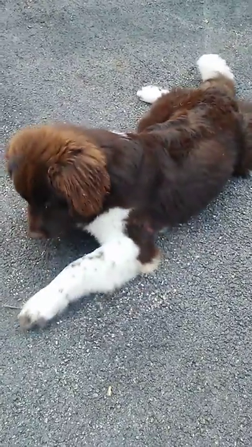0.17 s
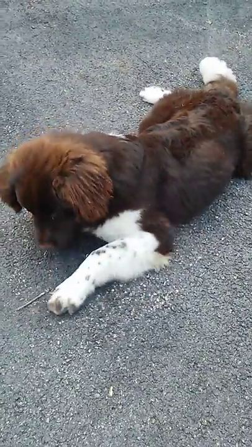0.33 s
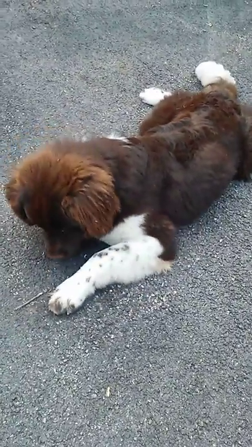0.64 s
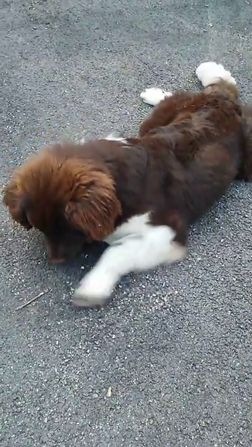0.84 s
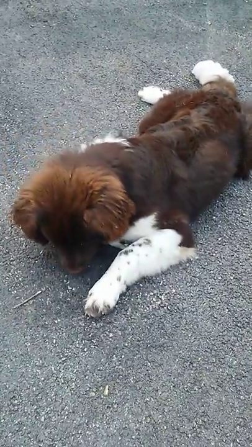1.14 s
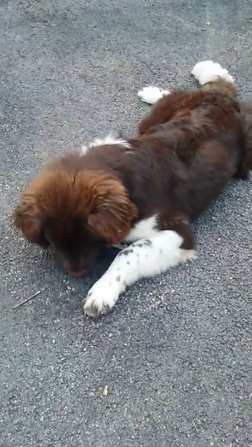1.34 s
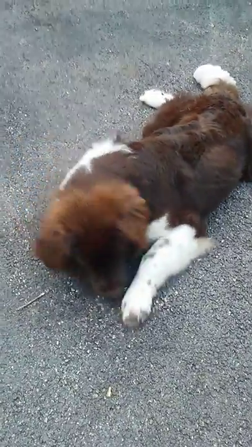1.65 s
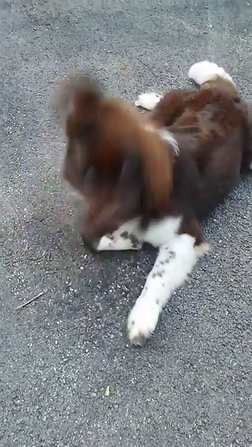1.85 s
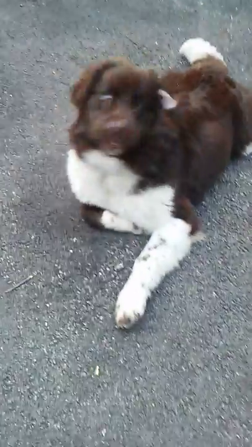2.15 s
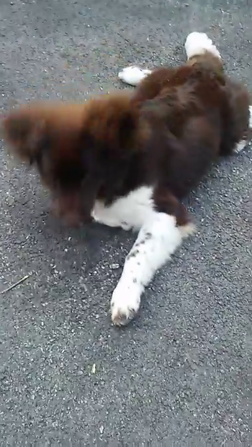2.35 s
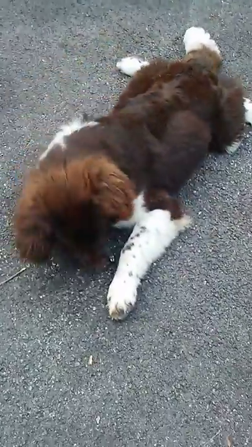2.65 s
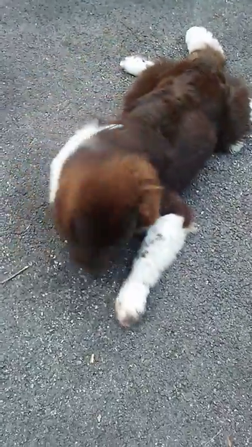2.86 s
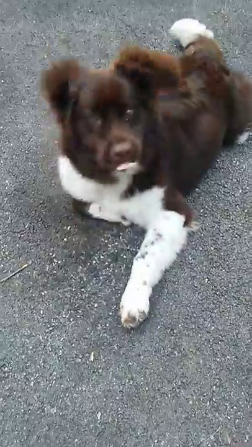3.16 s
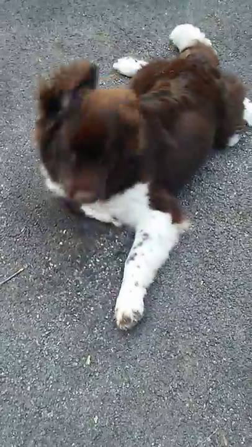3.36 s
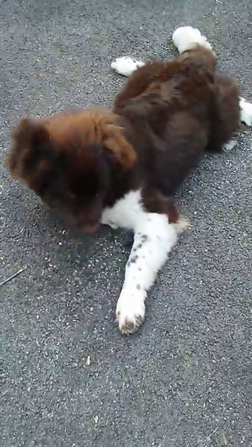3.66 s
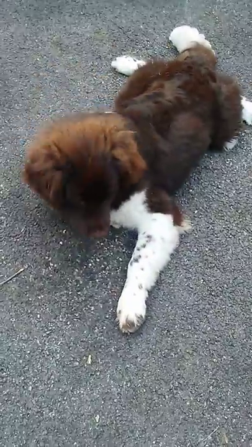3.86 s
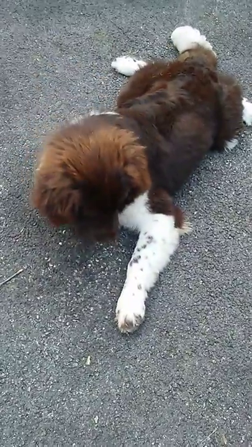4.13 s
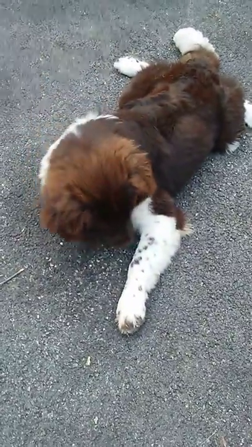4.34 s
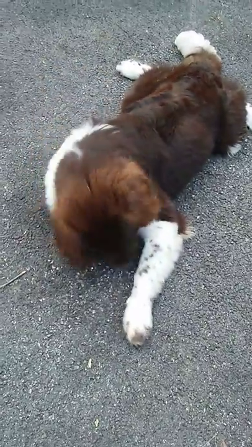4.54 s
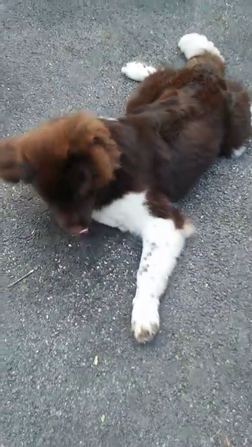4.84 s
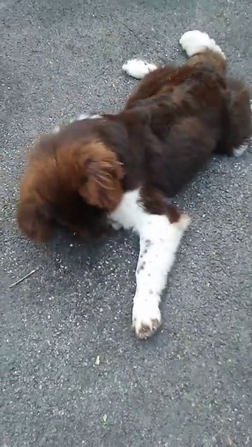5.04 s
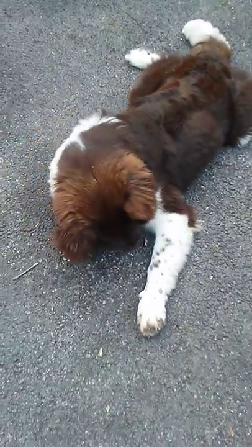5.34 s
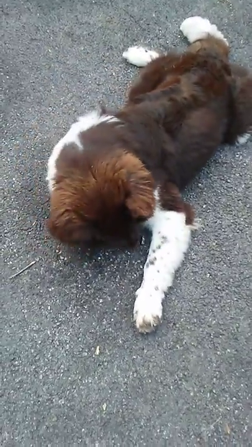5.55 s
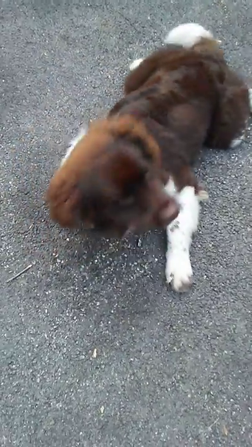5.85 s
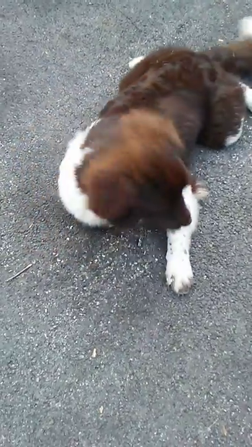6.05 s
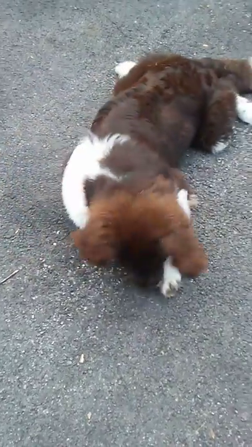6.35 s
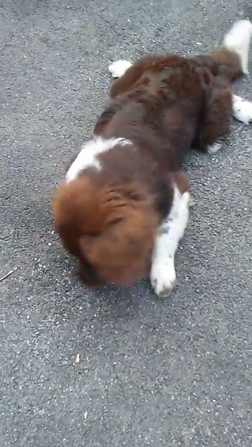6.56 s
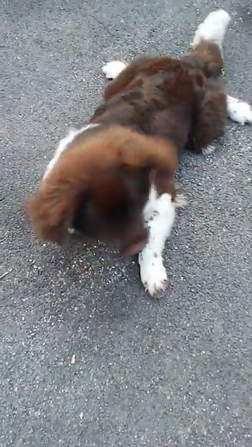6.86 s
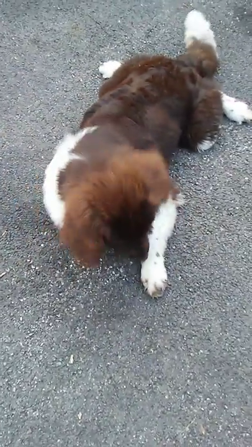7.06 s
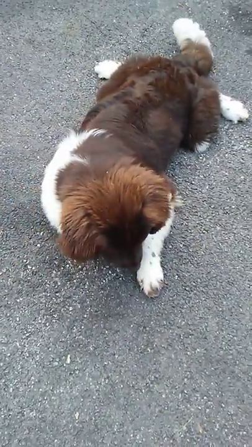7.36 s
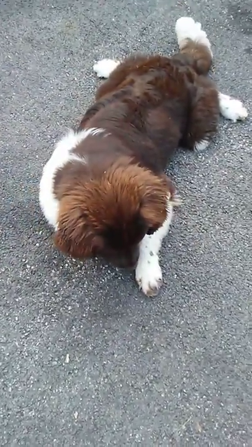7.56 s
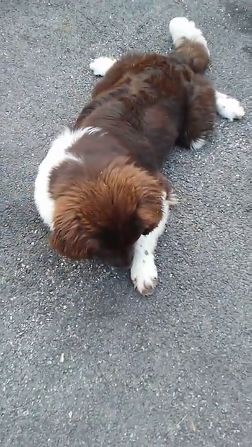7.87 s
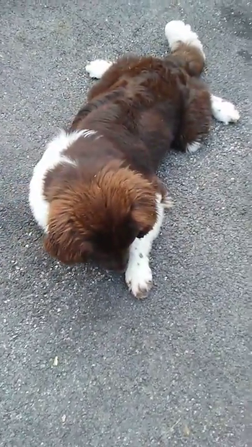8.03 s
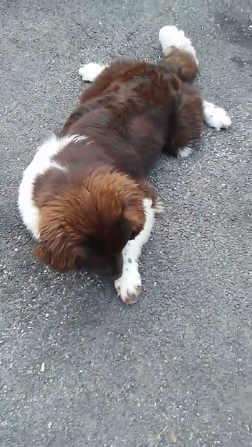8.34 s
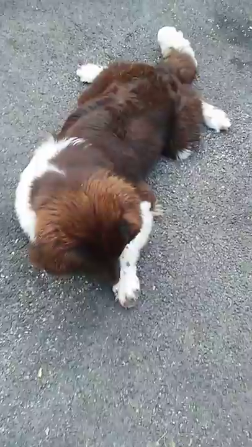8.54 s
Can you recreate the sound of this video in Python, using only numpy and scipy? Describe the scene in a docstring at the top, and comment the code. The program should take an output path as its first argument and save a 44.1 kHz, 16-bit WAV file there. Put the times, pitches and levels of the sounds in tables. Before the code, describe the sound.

A cicada close to the microphone starts at once with tiny chopped buzzes, then a dense, harsh, high burst from 0.1 to 0.8 seconds, a few fragments, and another burst from about 1.0 to 1.9, slowing at its end. Gritty rubs and wing scrapes sound near 0.1 and 1.9. Around 2.0 it stalls into dry clicks, then rasps again from 2.2 to 2.65 and 2.8 to 3.05. A bird farther off whistles nearly pure, swooping notes between 2.2 and 3.15. Bright stuttering clicks follow until 3.35, with a lone one at 3.6. From 4.0 a long buzz, slower and more ringing, about 55 to 70 pulses a second, swells and wavers to the end at 8.7. Low wind buffets come near 4.3 and 4.8. A faint distant engine hums from 3.1, fuller after 5.7, over soft outdoor rumble and hiss with a slight short echo.

```python
"""Outdoors on asphalt, a cicada close to the microphone buzzes in broken bursts from the start, its two tymbals
clicking in turn and ringing its hollow body; a puppy noses at it, and filtered grit makes rubs and wing scrapes.
Near 2 s the buzz stalls into single clicks and restarts; a bird farther off whistles gliding, nearly pure notes.
After 3 s a distant engine hums as wavering tones; near 4 s the buzz settles into one long burst, with wind buffets.
Outdoor air lies behind it all as coloured noise, and the yard returns a quick scatter and a faint tail."""
import sys
import numpy as np
from scipy import signal
from scipy.fft import rfft, irfft, next_fast_len
from scipy.io import wavfile
from scipy.ndimage import uniform_filter1d, map_coordinates

SR = 44100
rng = np.random.default_rng(int(sys.argv[2]) if len(sys.argv) > 2 else 0)


def generate_wav(signal):
    """Clip the signal to [-1, 1] and save it as 16-bit WAV at the path in sys.argv[1]."""
    frames = np.transpose(np.atleast_2d(signal))
    scaled = np.clip(frames, -1, 1) * 32767
    pcm = np.round(scaled).astype(np.int16)
    wavfile.write(sys.argv[1], SR, pcm)


N = 383669
TIME = np.arange(N) / SR
FAST_N = next_fast_len(N, real=True)

# bursts of buzz: (first stroke t/s, last stroke limit t/s, stroke rate f/Hz before spin-up and hurry, same at the end,
# tymbals at work, they take turns from t/s, until t/s, later ribs as a share of the first click before
# freshness and purity, unsteadiness 0-1 once settled, sharp edge level/dB relative to the snap when no longer fresh)
BURSTS = [(0.01, 0.06, 99, 100, 2, .064, .064, 0.43, .9, -23),
          (0.088, 0.811, 99, 86, 2, .41, .68, 0.32, 0.24, -23.5),
          (0.852, 0.88, 110, 93, 2, .882, .882, 0.26, 0.3, -27),
          (0.904, 0.936, 96, 96, 2, .94, .94, 0.44, .25, -24),
          (0.973, 1.675, 89, 83, 2, 0.95, 1.672, .65, 0.38, -23.5),
          (1.686, 1.888, 86, 58, 1, 1.684, 1.684, 0.7, 1, -25.5),
          (2.201, 2.663, 74, 70, 1, 2.199, 2.199, 0.48, .45, -13),
          (2.794, 3.066, 85, 61, 2, 2.85, 3.066, .5, 0.59, -25.5),
          (3.988, 8.69, 54.5, 55.7, 2, 4.21, 8.69, 0.42, 0.99, -19.5)]
# the long burst hurries now and then: (t/s, extra stroke rate f/Hz)
HURRY = [(3.99, 0), (4.05, 9), (4.55, 19), (4.72, 0), (4.86, 9), (5.15, 11), (5.75, 1), (5.95, 4.5),
         (6.3, 1), (6.42, 11), (6.62, 8), (6.75, 3), (8.1, 0)]
# lone clicks in the stall: (t/s, clicks, first level/dB, last level/dB, sharp edge level/dB relative to the snap);
# the first two levels are added to those of the body parts
STUTTERS = [(1.979, 3, -28.5, -32, -7), (2.1145, 1, -28.5, -28.5, -13), (2.6942, 1, -27, -27.5, -9),
            (2.729, 4, -28.5, -34, -10), (3.081, 5, -21.5, -15, -22), (3.186, 8, -15, -15, -19.5),
            (3.332, 1, -17, -17.5, -21), (3.6009, 1, -24, -23.5, -16)]
# body resonances in each phrase, before stroke-to-stroke changes: (t/s, belly level/dB, ring level/dB, snap level/dB)
FAST_PHRASE_LEVELS = [(.03, -45, -61, -48.5), (.27, -35.5, -43.5, -42), (.45, -38, -42, -47),
                      (.8, -40, -54, -58), (.87, -38.5, -46.5, -45.5), (.96, -45, -50, -59),
                      (1.05, -39, -50, -51), (1.3, -41.5, -47, -42), (1.64, -38.5, -40, -42.5),
                      (1.74, -50.5, -49, -49), (1.87, -43.5, -37, -41.5)]
BROKEN_PHRASE_LEVELS = [(2.2, -50.5, -45.5, -52.5), (2.32, -48.5, -37, -50.5), (2.48, -46, -32, -48.5),
                        (2.87, -50.5, -50.5, -54), (2.92, -35.5, -29, -39.5), (3.04, -34.5, -27.5, -35.5)]
LONG_PHRASE_LEVELS = [(4.0, -59, -47.5, -50.5), (4.33, -49, -39, -41.5), (4.46, -52, -43, -46),
                      (4.53, -58, -50, -51), (4.66, -48, -39.5, -47), (4.88, -49.5, -33, -44.5),
                      (5.03, -45, -42.5, -46.5), (5.15, -49, -44, -49.5), (5.35, -47, -24, -45),
                      (5.65, -48, -28, -45.5), (5.8, -47, -36, -47.5), (6.03, -41.5, -31.5, -42),
                      (6.3, -46.5, -33.5, -45.5), (6.42, -61, -45, -51.5), (6.56, -48.5, -40, -47),
                      (6.67, -41, -27.5, -40.5), (7.09, -41, -27, -37), (7.125, -45, -33, -41),
                      (7.39, -49, -37.5, -50.5), (7.55, -46.5, -31, -44), (7.98, -46.5, -33, -41),
                      (8.23, -49.5, -37, -45), (8.58, -49.5, -39, -47), (8.69, -49, -33, -44)]
# the way the insect holds its body: (t/s, belly resonance f/Hz, tymbal ring f/Hz)
BODY_POSE = [(0, 3100, 4680), (.8, 3300, 4610), (1.1, 3440, 4930), (2.95, 3450, 4950), (3.3, 3600, 5050),
             (4.3, 3490, 4810), (5.45, 3402, 5160), (5.9, 3200, 4895), (7.0, 3405, 4934), (7.5, 3290, 4810)]
# body modes in the reference pose, undamped: (f/Hz, whole length/ms, level/dB within its group)
BELLY_MODES = [(2963, 3.3, 5), (3550, 1.96, 14.5)]
PLATE_MODES = [(4934, 2.68, 0)]
SNAP_MODES = [(5700, 4.1, -1), (6171, 4.8, 6), (6661, 3.06, 10), (7260, 1.9, -0.5)]
EDGE_MODES = [(8103, 1.05, 1.5), (9925, 1.25, -10.5), (14250, 0.96, -13.5)]
BELLY_HZ, RING_HZ = 3432, 4913  # the reference pose

# a burst starts this share slow, and moves to its end rate mostly late
SPIN_UP, SPIN_UP_S, SAG_POWER = .2, .04, 2.5
# the first strokes are sharper and rattle more; that wears off
FRESH_S, FRESH_EDGE_DB, FRESH_RATTLE = 0.95, 8.5, 0.66
STALL_HZ = 57.1  # stroke rate when the buzz stalls
# the tymbals buckle almost together at the slowest pace and part as it quickens, up to a share of the period
TOGETHER_MS, TOGETHER_HZ, PARTING_MS_PER_HZ, WIDEST_SHARE = 2.3, 54.15, .7, .43
SLIDE_MS, SLIDE_HZ = 2.3, 16  # the two tymbals slide in and out of step
IN_STEP_MS = 2  # lag of the second tymbal while the two work in step
UNEVEN_DB = 1.27  # spread of strength from stroke to stroke
SWELL_DB, SWELL_HZ = 1.3, 14  # the strength of both tymbals also swells and dips
# as the plate's ring stands further above the belly, the later ribs fade (dB per dB)
PURE_FROM_DB, PURITY = 8, 0.42
# mean delays of the second and third ribs behind the first, and the third's strength relative to the second
RIB_MS, LAST_RIB_MS, LAST_SHARE = 2.2, 3.4, .5
JITTER_MS, GLIDE_MS, GLIDE_HZ = .035, .1, 3  # rib delays vary a little from stroke to stroke and glide slowly
# the later ribs ring the belly and the overtones more than the plate, and shorten its ring
BELLY_RATTLE, SNAP_RATTLE, LOSS = 1.3, 1.6, .3
SCATTER = .008  # detuning of a stroke, as a share of pitch

# gritty rubs, wing scrapes and low wind buffets: (t/s, length/s, centre f/Hz, width f/Hz, level/dB)
SCUFFS = [(0.121, 0.29, 2550, 700, -45), (1.896, 0.076, 2620, 1000, -44), (1.886, 0.055, 866, 120, -46.5),
          (1.942, 0.15, 2720, 500, -48.5), (2.06, 0.12, 2730, 500, -53), (2.66, 0.085, 121, 40, -49),
          (2.786, 0.19, 6140, 1200, -69), (3.33, 0.071, 5900, 1800, -58), (4.266, 0.036, 2770, 400, -51),
          (4.254, .14, 104, 38.2, -50.5), (4.702, 0.24, 77, 30, -48)]
# one list a whistled note: (t/s, pitch f/Hz before smoothing and waver, level/dB before the taper)
BIRD_NOTES = [
    [(2.235, 3000, -57), (2.26, 2760, -44), (2.28, 2740, -41), (2.305, 2860, -42), (2.33, 2790, -38.5),
     (2.362, 2700, -43)],
    [(2.498, 3060, -49), (2.53, 2690, -39), (2.55, 2540, -46), (2.566, 2750, -39), (2.585, 3050, -31.5),
     (2.605, 2790, -42), (2.628, 2520, -41)],
    [(2.705, 2720, -43), (2.745, 2410, -43.5), (2.77, 2740, -43.5), (2.79, 3140, -43), (2.83, 3020, -36.5)],
    [(3.03, 2590, -42), (3.09, 3280, -41), (3.148, 2790, -41)],
    [(3.88, 2300, -75), (3.97, 3000, -71), (4.04, 3200, -59)],
]
# outdoor reverberation: (f/Hz, time to fall by 60 dB/s)
YARD_DECAY = [(500, 0.065), (3000, 0.3), (6000, 0.28), (12000, 0.018)]
NEAR_S = .006  # decay constant of the close scatter
# distant engine tones, before offset, waver and flutter: (t/s, f/Hz, level/dB)
LOW_DRONE = [(3.15, 122, -54), (3.3, 120.6, -50), (3.6, 108, -69), (4.0, 106.1, -54.5), (5.3, 105, -53),
             (6.6, 110.8, -44.5), (7.6, 108.9, -45.5), (8.7, 113.6, -49)]
UPPER_DRONE = [(5.68, 181.3, -51.5), (7.0, 176.1, -50), (7.3, 173.5, -44.5), (7.7, 171.1, -47.5),
               (8.7, 165, -49.5)]
# outdoor air, before offsets and gusts:
# (t/s, rumble level/dB, wash level/dB, traffic murmur level/dB, hiss level/dB)
AIR_LEVELS = [(0.0, -59, -53, -55.5, -72), (1.5, -60.5, -53, -52, -63.5), (3.1, -55.5, -56.5, -58, -60.5),
              (3.78, -61, -60.5, -63.5, -92), (4.38, -52.5, -55, -58, -62), (8.48, -51.5, -56, -63, -62),
              (8.7, -49, -57.5, -56, -70)]
# relative spectra of the four air layers: (f/Hz, level/dB per Hz)
RUMBLE_SPECTRUM = [(20, -13), (35, -45), (58, 3), (85, 0), (125, 2), (160, -10), (215, -4.5), (280, -17),
                   (500, -45.5)]
WASH_SPECTRUM = [(50, -31), (130, 2.5), (280, 2), (420, 2), (620, 0), (820, 4.5), (980, 6.5), (1200, -27.5),
                 (2000, -27)]
MURMUR_SPECTRUM = [(600, -51), (900, 0.5), (1040, 8), (1150, 2.5), (1400, 1), (1800, -1), (2500, -1.5),
                   (3200, -14.5), (6000, -37), (11000, -35)]
HISS_SPECTRUM = [(2000, -21), (6000, 11), (11500, -12), (14500, -8.5)]
TOP_HZ = 15950  # almost nothing sounds above


def buzz():
    """All the bursts of the cicada's song, close to the microphone."""
    return sum(burst(*row) for row in BURSTS)


def burst(start, end, cruise_hz, end_hz, tymbals, apart_from, apart_until, rattle, unsteady, edge_db,
          jitter_ms=.2, lag_jitter_ms=.6, unsettled=.95):
    """One burst of buzz: paced strokes of one tymbal, with the other, if at work, trailing it."""
    times, hz = pace(start, end, cruise_hz, end_hz)
    settled = times >= apart_from
    fresh = np.exp(-(times - start) / FRESH_S)
    unsteady = np.where(settled, unsteady, unsettled)  # steady strokes fuse into a pitched rasp

    parting_ms = PARTING_MS_PER_HZ * np.maximum(hz - TOGETHER_HZ, 0)
    slide_ms = unsteady * SLIDE_MS * wander(times, SLIDE_HZ)
    lag_ms = abs(TOGETHER_MS + parting_ms + slide_ms)
    lag_ms = np.minimum(lag_ms, WIDEST_SHARE * 1000 / hz)
    lag_ms = np.where(settled & (times < apart_until), lag_ms, IN_STEP_MS)

    levels_db = follow(FAST_PHRASE_LEVELS + BROKEN_PHRASE_LEVELS + LONG_PHRASE_LEVELS, times)
    belly_db, ring_db, _ = levels_db
    swell_db = SWELL_DB * unsteady * wander(times, SWELL_HZ)
    purity_db = -PURITY * np.maximum(ring_db - belly_db - PURE_FROM_DB, 0)
    rattle = rattle * (1 + FRESH_RATTLE * fresh) * amp(purity_db)

    count = round(tymbals)
    out = np.zeros(N)
    for late_ms, spread_ms in [(0, jitter_ms), (lag_ms, lag_jitter_ms)][:count]:
        slip, force = unsteady * rng.standard_normal((len(times), 2)).T
        # the power is shared among the strokes of each second
        levels = [amp(db + swell_db + UNEVEN_DB * force) / np.sqrt(hz * count) for db in levels_db]
        at = times + (late_ms + slip * spread_ms) / 1000
        out += buckle(at, levels, rattle, unsteady, edge_db + FRESH_EDGE_DB * fresh)
    return out


def pace(start, end, cruise_hz, end_hz):
    """Stroke times and rates of one burst: the muscle spins up, cruises and drifts to its end rate."""
    age = np.linspace(0, end - start, num=2000)
    hz = cruise_hz + (end_hz - cruise_hz) * (age / age[-1]) ** SAG_POWER
    hz = hz + follow(HURRY, start + age)[0]
    hz = hz * (1 - SPIN_UP * np.exp(-age / SPIN_UP_S))
    turns = (np.cumsum(hz) - hz[0]) * age[1]
    # evenly spaced turns, about one a stroke
    strokes = np.linspace(0, turns[-1], num=round(turns[-1]) + 1)
    return start + np.interp(strokes, turns, age), np.interp(strokes, turns, hz)


def stutter(belly_db=-42, ring_db=-34, snap_db=-38, late_ms=1.1, rattle=0.69, unsteady=.7):
    """Lone strokes, or short runs at the slow pace of the stalled buzz."""
    out = np.zeros(N)
    for s, clicks, first_db, last_db, edge_db in STUTTERS:
        db = np.linspace(first_db, last_db, num=round(clicks))
        times = s + late_ms / 1000 + np.arange(len(db)) / STALL_HZ
        levels = [amp(db + part) for part in (belly_db, ring_db, snap_db)]
        out += buckle(times, levels, np.full(len(db), rattle), np.full(len(db), unsteady), edge_db)
    return out


def buckle(times, levels, rattle, unsteady, edge_db, belly_late_ms=.45, snap_late_ms=1.0):
    """A tymbal stroke: three ribs buckle in a row, each ringing belly, tymbal plate and bright overtones."""
    belly_hz, ring_hz = follow(BODY_POSE, times)
    chance = unsteady[:, None] * rng.standard_normal((len(times), 4))
    delay_ms = np.array([0, RIB_MS, LAST_RIB_MS]) + JITTER_MS * chance[:, 1:]
    delay_ms = delay_ms + GLIDE_MS * wander(times, GLIDE_HZ)[:, None] * np.arange(3)
    rib_times = (times[:, None] + delay_ms / 1000).ravel()

    steady = np.ones(len(times))
    detune = 1 + SCATTER * chance[:, 0]
    belly, ring, snap = levels
    # (modes, level, pitch stretch, damping, later ribs' share, lateness ms);
    # a rattling tymbal also rings more briefly, so its band widens
    parts = [(BELLY_MODES, belly, belly_hz / BELLY_HZ, steady, BELLY_RATTLE * rattle, belly_late_ms),
             (PLATE_MODES, ring, ring_hz / RING_HZ, 1 + LOSS * rattle, rattle, 0),
             (SNAP_MODES, snap, steady, steady, SNAP_RATTLE * rattle, snap_late_ms),
             (EDGE_MODES, snap * amp(edge_db), steady, steady, rattle, snap_late_ms)]
    out = np.zeros(N)
    for modes, level, stretch, damping, share, late_ms in parts:  # the plate sounds first, then the body answers
        ribs = np.transpose([steady, share, LAST_SHARE * share])
        sizes = level[:, None] * ribs / np.linalg.norm(ribs, axis=1, keepdims=True)
        answer = rib_times + late_ms / 1000
        out += strike(answer, sizes.ravel(), modes, np.repeat(stretch * detune, 3), np.repeat(damping, 3))
    return out


def strike(times, sizes, modes, stretch, damping):
    """Each click swells and dies in its modes within milliseconds; its energy is its size squared."""
    t = np.arange(-100, 101) / SR
    rings = np.zeros((len(times), len(t)))
    for hz, length_ms, db in modes:
        age = np.clip(1000 * t * damping[:, None] / length_ms, -.5, .5)
        swell = np.cos(np.pi * age) ** 2
        rings += amp(db) * swell * np.sin(2 * np.pi * hz * stretch[:, None] * (t - t[0]))
    rings *= (sizes / np.sqrt((rings ** 2).sum(1) / SR))[:, None]
    out = np.zeros(N)
    for s, ring in zip(times, rings):
        add(out, s + t[0], ring)
    return out


def scuffs(grain_db=4.0):
    """Short gritty rubs, wing scrapes and low wind buffets: uneven noise through a resonance."""
    out, hz = np.zeros(N), np.fft.rfftfreq(SR, 1 / SR)
    for s, length, centre_hz, width_hz, db in SCUFFS:
        grain = unit(uniform_filter1d(rng.standard_normal(SR), size=120))
        grit = rng.standard_normal(SR) * amp(grain_db * grain)
        resonance = 1 / (1 + (2 * (hz - centre_hz) / width_hz) ** 2)
        rub = irfft(rfft(grit) * resonance, SR)[:int(length * SR)]
        add(out, s, amp(db) * unit(rub * signal.windows.tukey(len(rub), .7)))
    return out


def bird(waver=0.01):
    """A bird farther off: nearly pure whistled notes whose pitch swoops up and down."""
    out, wobble = np.zeros(N), 1 + waver * drift(148.6)
    for note in BIRD_NOTES:
        t = np.arange(note[0][0], note[-1][0], 1 / SR)
        hz, db = follow(note, t)
        smooth_hz = uniform_filter1d(hz, size=500)
        turns = np.cumsum(smooth_hz * np.interp(t, TIME, wobble)) / SR
        whistle = unit(np.sin(2 * np.pi * turns))
        add(out, t[0], amp(db) * whistle * signal.windows.tukey(len(t), .15))
    return out


def yard(x, near_db=-17, far_db=-20):
    """Quick scatter from the ground and the puppy, then a faint outdoor tail with its own decay by pitch."""
    taps = rng.standard_normal(SR // 2)
    hz, t, z = signal.stft(taps, SR, nperseg=256)
    decay = amp(-60 * t / spectrum_at(YARD_DECAY, hz)[:, None])
    far = signal.istft(z * decay, SR, nperseg=256)[1][:len(taps)]
    age = np.arange(len(taps)) / SR
    near = rng.standard_normal(len(taps)) * np.exp(-age / NEAR_S) * (age > .001)
    far = far * (age > .006)
    echo = amp(near_db) * near / np.linalg.norm(near) + amp(far_db) * far / np.linalg.norm(far)
    return signal.fftconvolve(x, echo)[:N]


def engine(rows, db, waver=0.01, flutter_db=2.5, fade_s=.1):
    """One tone of a far engine, wavering in pitch and level; it fades in just before its first row."""
    hz, level_db = follow(rows, TIME)
    tone = unit(np.sin(2 * np.pi * np.cumsum(hz * (1 + waver * drift(7.9))) / SR))
    fade = np.clip((TIME - rows[0][0]) / fade_s + 1, 0, 1)
    return tone * amp(db + level_db + flutter_db * drift(13.0)) * fade


def air(rumble_db=2.5, wash_db=0., murmur_db=2.0, hiss_db=6.0, gust_db=2.01):
    """Coloured noises: low rumble, the wash and higher murmur of far traffic, and a thin hiss."""
    rumble, wash, murmur, hiss = follow(AIR_LEVELS, TIME)
    out = noise(RUMBLE_SPECTRUM) * amp(rumble + rumble_db)
    out += noise(WASH_SPECTRUM) * amp(wash + wash_db + gust_db * drift(21))
    out += noise(MURMUR_SPECTRUM) * amp(murmur + murmur_db + gust_db * drift(24))
    out += noise(HISS_SPECTRUM) * amp(hiss + hiss_db)
    return out


def noise(spectrum):
    """Steady noise of the given colour, rms 1."""
    gain = amp(spectrum_at(spectrum, np.fft.rfftfreq(FAST_N, 1 / SR)))
    return unit(irfft(rfft(rng.standard_normal(FAST_N)) * gain, FAST_N)[:N])


def drift(hz):
    """Random wander of rms 1, mostly slower than hz."""
    lowpass = 1 / (1 + (np.fft.rfftfreq(FAST_N, 1 / SR) / hz) ** 4)
    return unit(irfft(rfft(rng.standard_normal(FAST_N)) * lowpass, FAST_N)[:N])


def wander(times, hz):
    """Smooth random values at the given times, changing about hz times a second."""
    return map_coordinates(rng.standard_normal(400), [times * hz], order=3, mode="reflect")


def amp(db):
    """Decibels to gain."""
    return 10 ** (np.asarray(db) / 20)


def unit(x):
    """Scales to an rms of 1."""
    return x / np.sqrt(np.mean(x ** 2) + 1e-20)


def follow(rows, t):
    """The columns of a curve at the times t."""
    s, *columns = np.transpose(rows)
    return [np.interp(t, s, c) for c in columns]


def spectrum_at(points, hz):
    """A curve over frequency, read on a log scale at hz."""
    f, value = np.transpose(points)
    return np.interp(np.log(hz + 1), np.log(f + 1), value)


def add(mix, s, sound):
    """Mixes a sound in at s seconds."""
    part = mix[max(round(s * SR), 0):][:len(sound)]
    part += sound[:len(part)]


def scene(bird_echo_db=5):
    """The close insect and scuffs, the farther bird with more echo, and the background."""
    close = buzz() + stutter() + scuffs()
    song = bird()
    echo = yard(close + amp(bird_echo_db) * song)
    hum = engine(LOW_DRONE, db=0.0) + engine(UPPER_DRONE, db=-1.5)
    return (close + song + echo + hum + air())[None]


def record(dry):
    """A steep low-pass: almost nothing sounds above about 16 kHz."""
    lowpass = signal.firwin(511, TOP_HZ, window=("kaiser", 9), fs=SR)
    return signal.oaconvolve(dry, lowpass[None], "same")


dry = scene()
out = record(dry)
generate_wav(out)
```